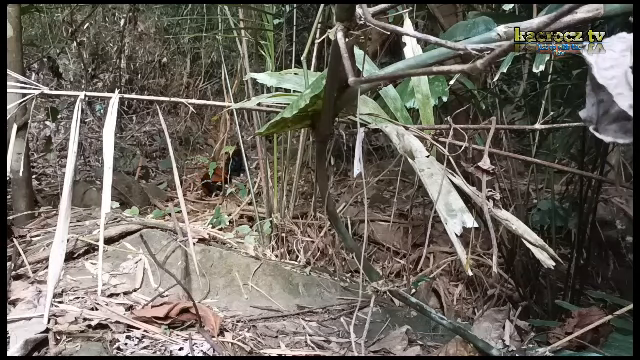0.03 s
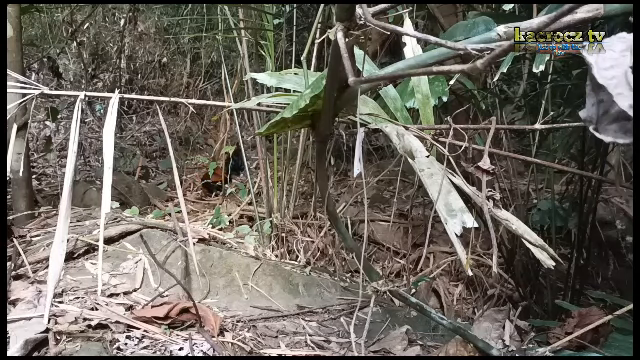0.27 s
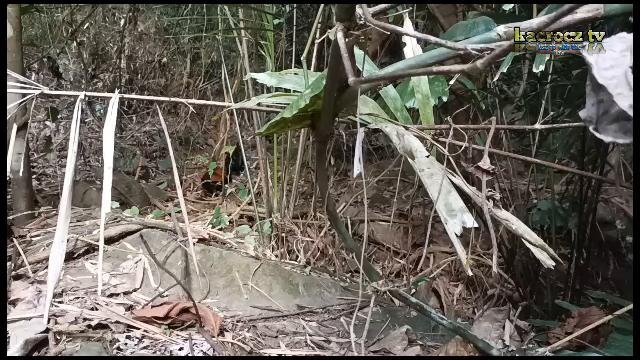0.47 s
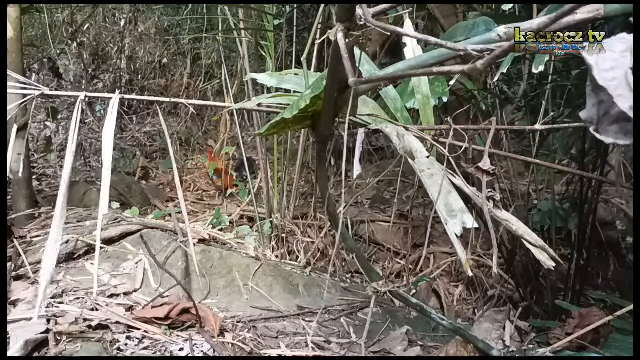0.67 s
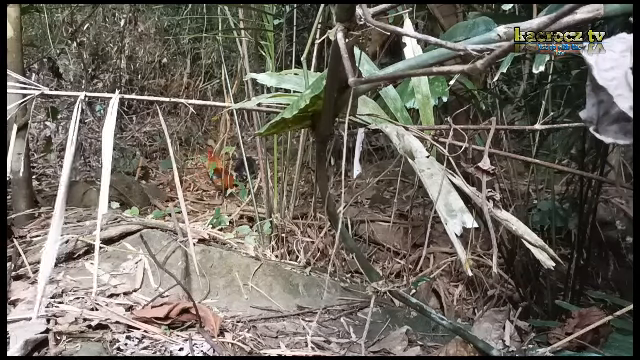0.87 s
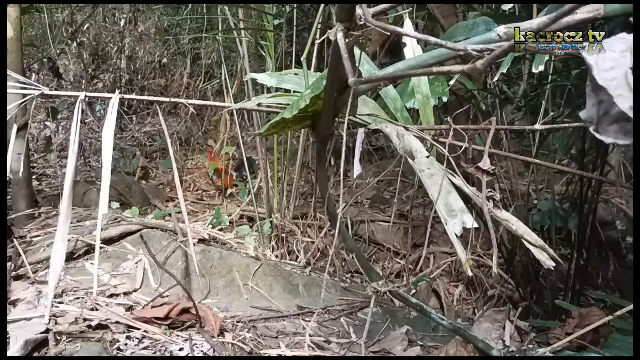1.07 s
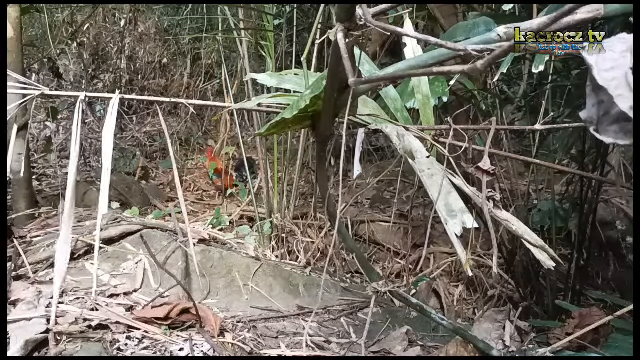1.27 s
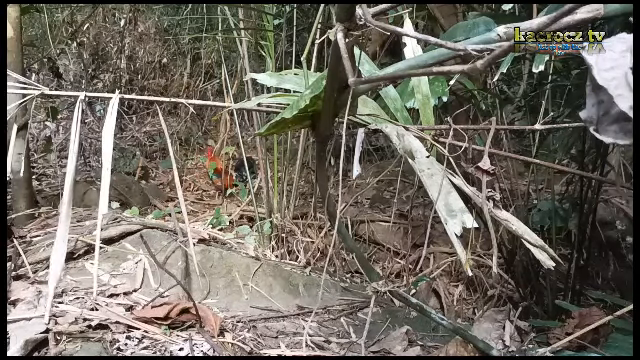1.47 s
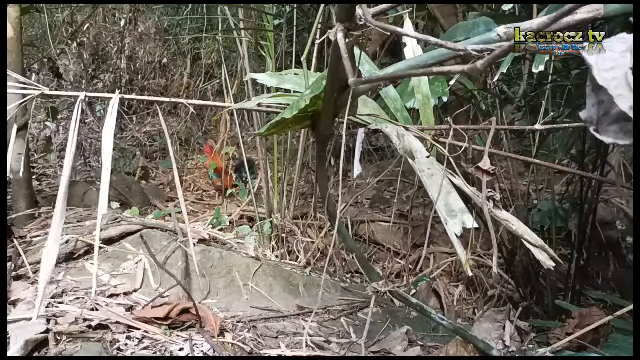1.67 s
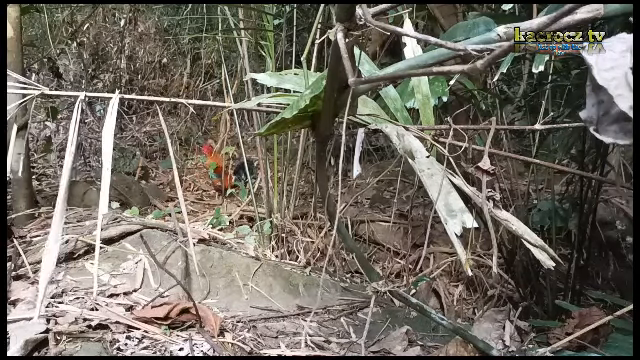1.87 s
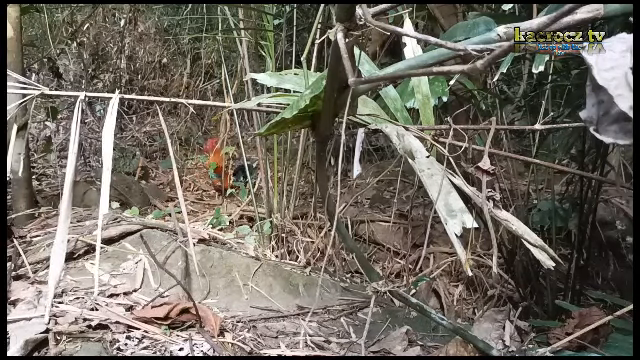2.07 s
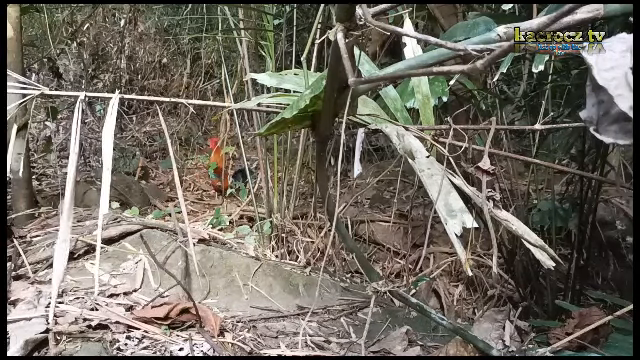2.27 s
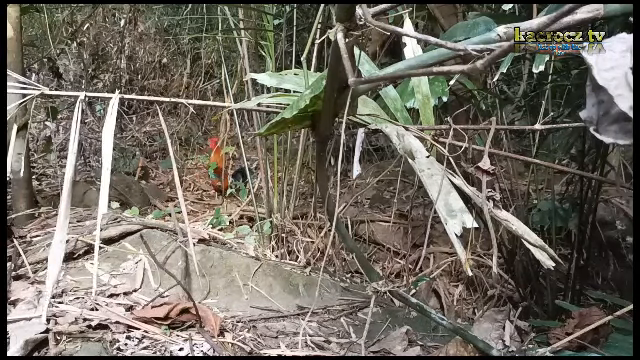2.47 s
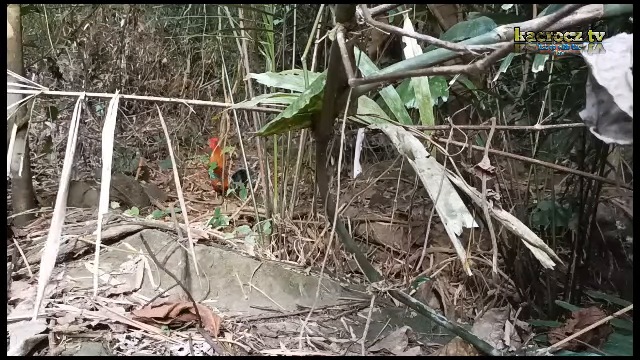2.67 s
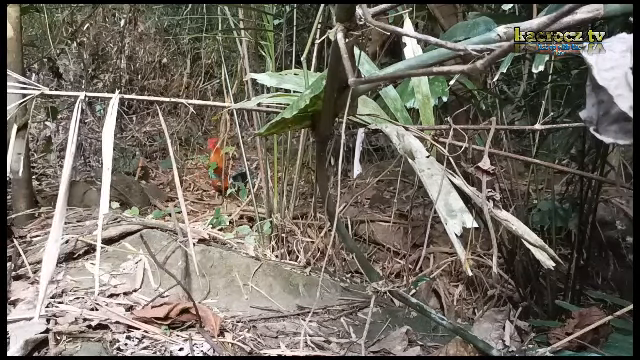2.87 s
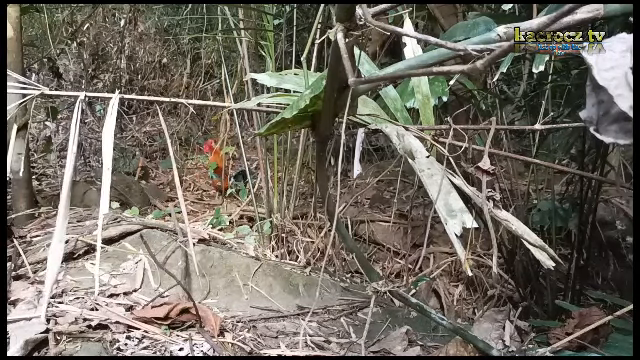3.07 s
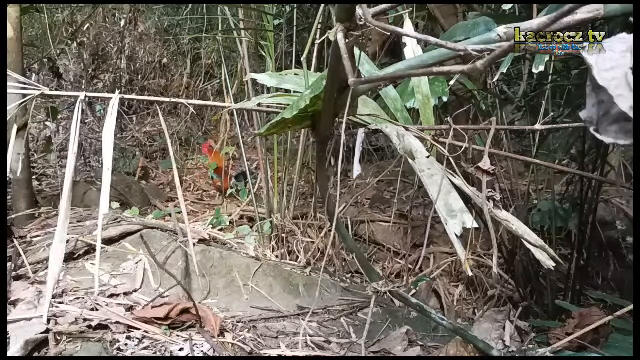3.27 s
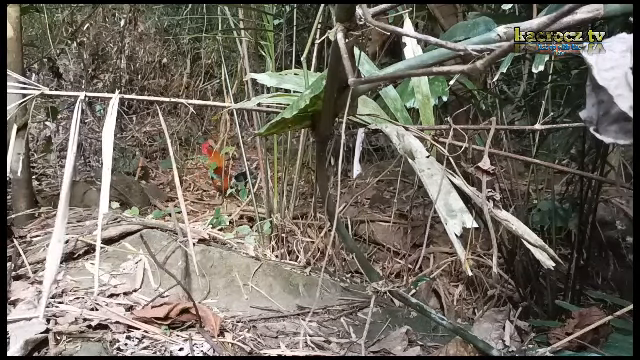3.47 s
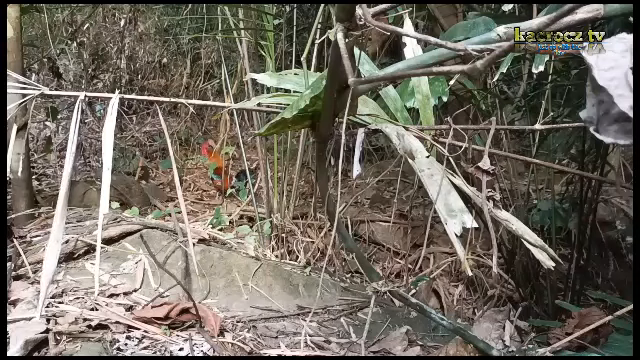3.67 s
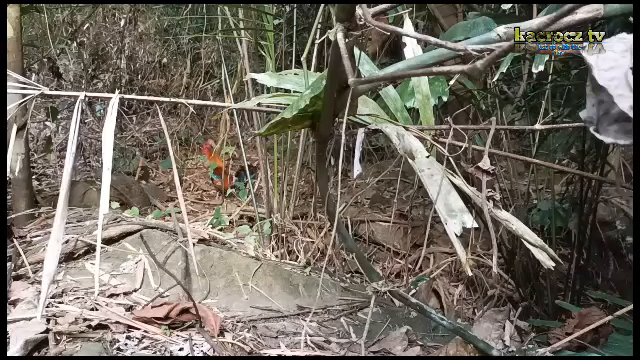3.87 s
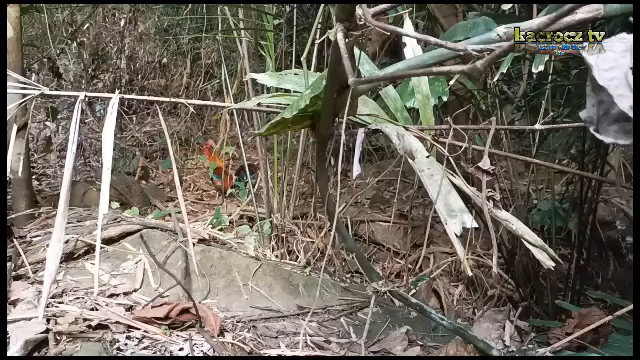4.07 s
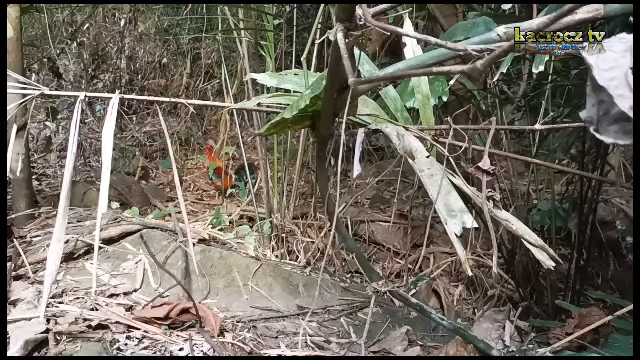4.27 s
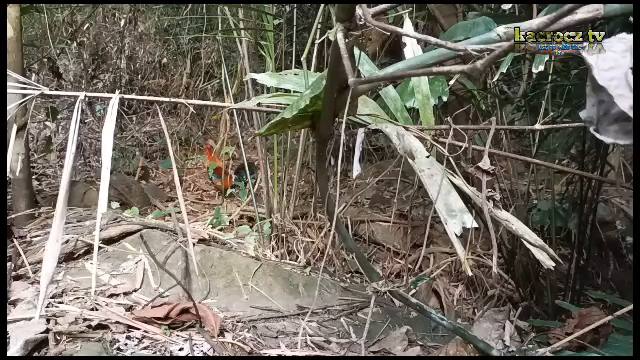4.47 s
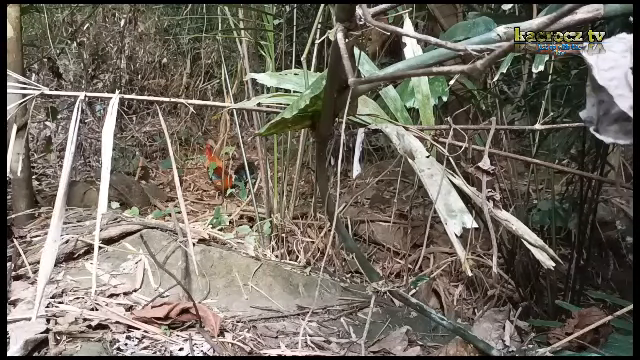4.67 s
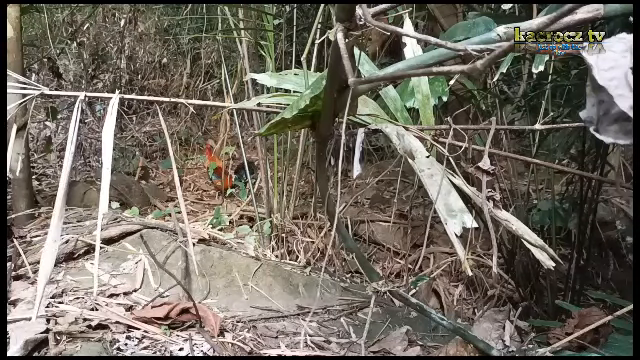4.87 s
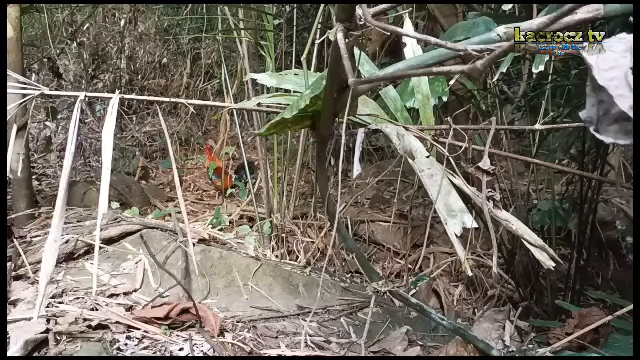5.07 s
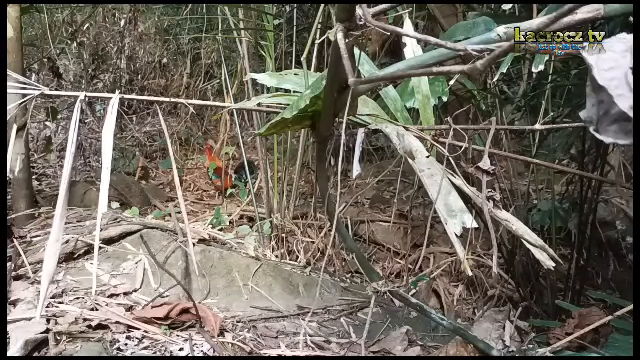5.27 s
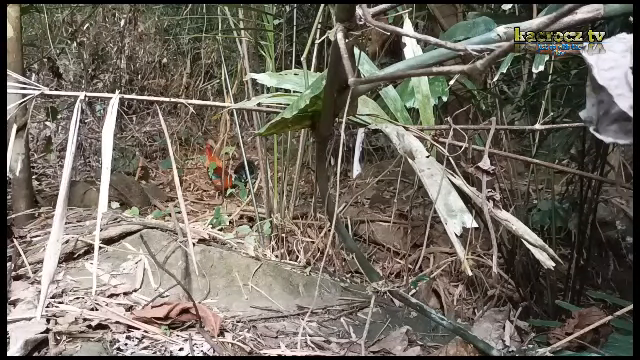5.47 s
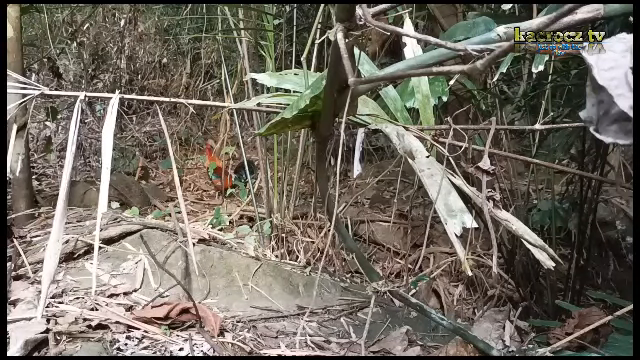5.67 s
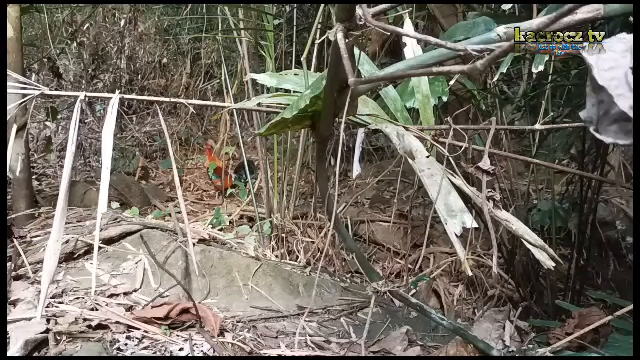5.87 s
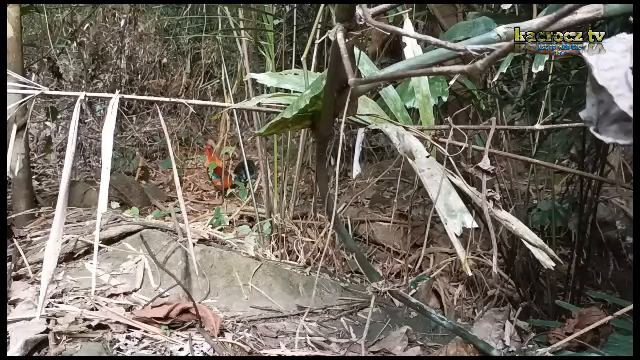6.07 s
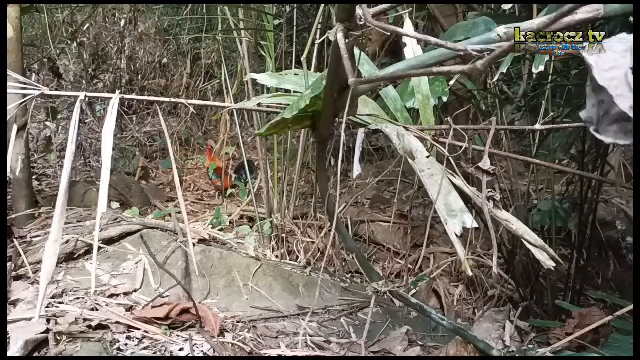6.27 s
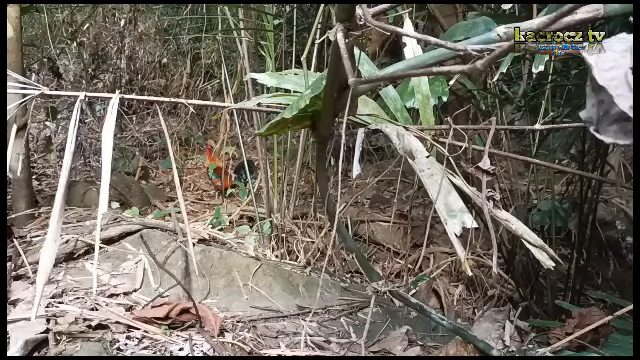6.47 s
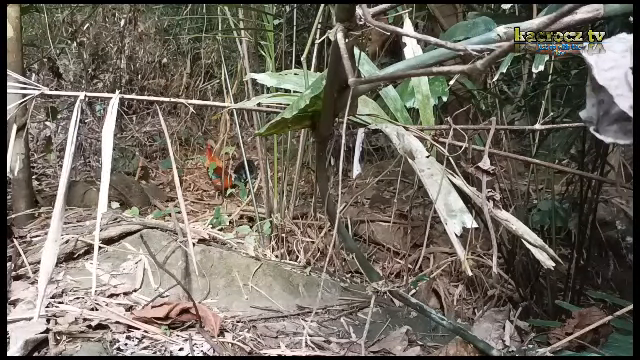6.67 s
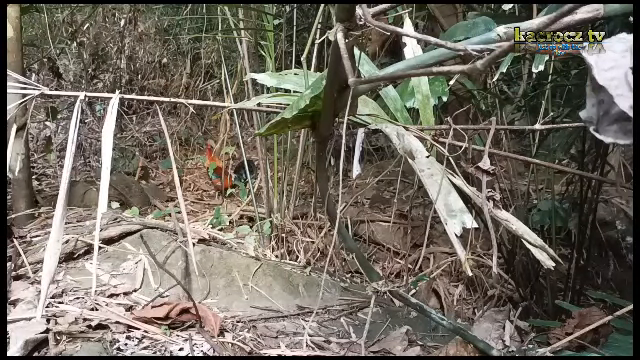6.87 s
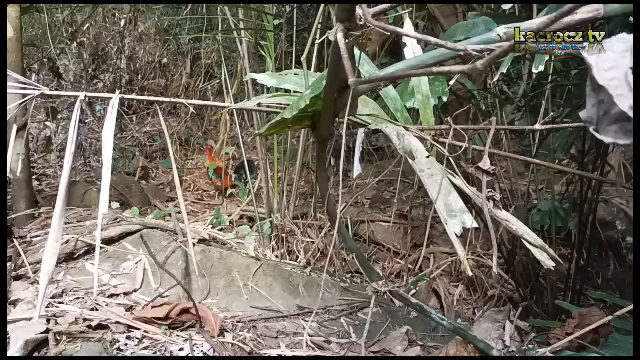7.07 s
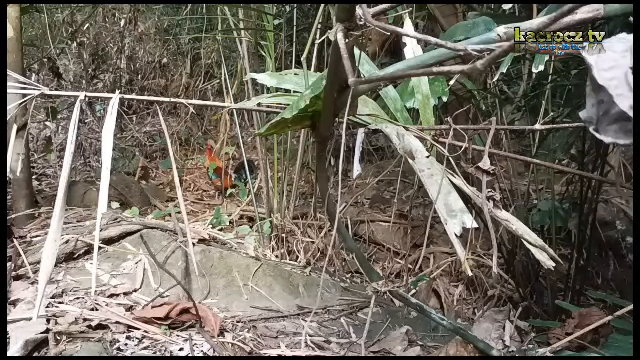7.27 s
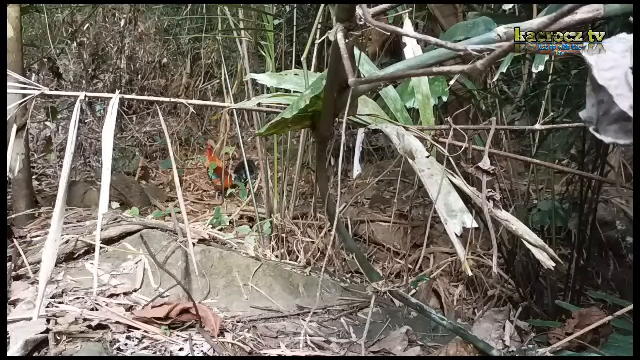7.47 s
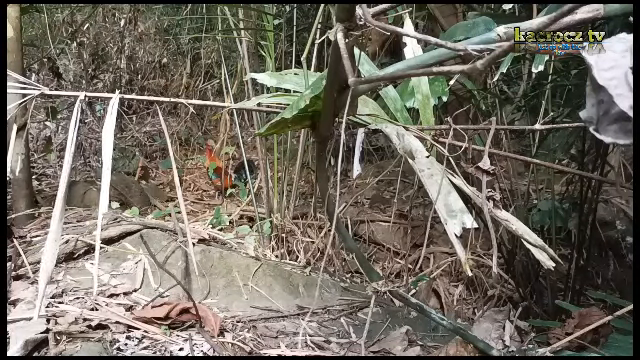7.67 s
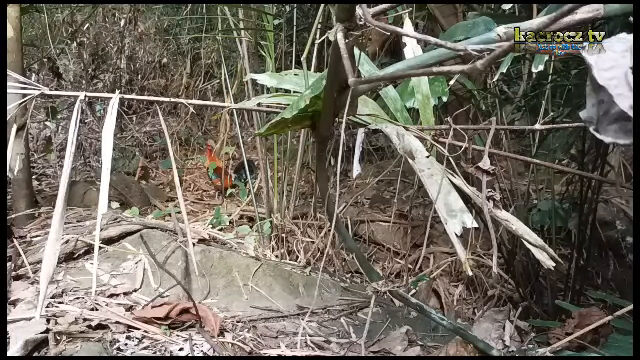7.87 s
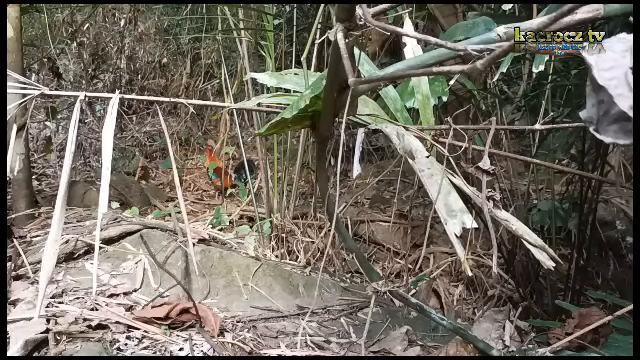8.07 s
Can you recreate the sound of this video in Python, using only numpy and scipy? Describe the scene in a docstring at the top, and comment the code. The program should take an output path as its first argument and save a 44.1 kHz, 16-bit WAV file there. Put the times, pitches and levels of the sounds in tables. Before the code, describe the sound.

A quiet forest with soft distant rumble, a fading low drone until about 3 s, and a thin steady insect hum near 6.3 kHz. Small birds are faint: thin high chirps at the start and two-note calls, high then lower, at 0.4, 1.2 and 1.8 s. The level dips very briefly at 0.7 s, cutting the first call's echo. From 2.1 to 3.75 s a wild rooster crows once, much louder than everything else: a raspy short syllable, a second with a clear yelp inside, a longer hoarse one at 2.6 s, then a note that clears, sinks and abruptly stops, with short woodland reverberation. From 4.2 s short piped notes, echoing down-slurred whistles, thin dropping calls on the right and tiny faint clucks alternate. Dry leaves stir lightly around 4.7, 5.5 and 7.3 s. A fast insect trill, stronger on the right, swells from 4.8 and stops near 6.9 s. Piping continues to 8 s.

```python
"""Forest undergrowth before two spaced microphones: filtered noise makes a low distant rumble and dry leaves,
blurred tones a high insect hum, gliding sines the thin calls, a far flock and a two-note bird.
The level dips briefly at 0.7 s and the echo of the first two-note call stops short. From 2.1 s a wild
rooster crows once: uneven pulses through resonances give hoarse syllables, partials two clear pitches.
Then piped notes, slurred whistles and faint clucks glide among the trees, leaves stir, and an insect trills."""
import sys
import numpy as np
from scipy import signal
from scipy.fft import rfft, irfft, next_fast_len
from scipy.io import wavfile
from scipy.ndimage import uniform_filter1d, map_coordinates

SR = 44100
rng = np.random.default_rng(int(sys.argv[2]) if len(sys.argv) > 2 else 0)


def transcribe(signal):
    """Save signal, clipped to [-1, 1], as a 16-bit WAV file at the path in sys.argv[1]."""
    frames = np.atleast_2d(signal).T
    limited = np.clip(frames, -1, 1)
    pcm = np.round(limited * 32767).astype(np.int16)
    wavfile.write(sys.argv[1], SR, pcm)


N = 358533
TIME = np.arange(N) / SR
EDGE_DB = -40  # where a swell starts and ends, under its top

# All levels are at the source, before its scatter and echo and before the microphones.
# distant air, its spectrum: (frequency [Hz], relative level per Hz [dB])
AIR_SPECTRUM = [(15, -22), (25, -19), (54, 0), (86, 0.5), (258, -4), (376, -8.5), (505, -8), (818, -9),
                (911, -11.5), (2210, -14), (5080, -27.5), (6290, -29), (7190, -30), (15200, -47.5)]
# distant air over time: (time [s], level [dB])
AIR_LEVEL = [(0, -58), (4, -57.5), (8.13, -57.5)]
# likeness of the air at the two microphones: (frequency [Hz], correlation [-1 to 1])
AIR_LIKENESS = [(40, .85), (100, .55), (290, .35), (700, .15), (2000, 0)]
# low drone, of which only the dying away is heard: (start [s], attack [s], hold [s], release [s], level [dB])
DRONE = (-1.6, 0.56, -1.8, 6, -53)
# far insect hum: (time [s], frequency [Hz], level [dB])
INSECT_HUM = [(0, 6400, -67.5), (.7, 6420, -69), (.72, 6255, -66), (2.05, 6340, -68), (5.5, 6300, -67),
              (7.3, 6350, -69), (8.13, 6400, -68.5)]
# stirs of dry leaves: (start [s], attack [s], release [s], level [dB])
LEAF_STIRS = [(-.01, .01, .2, -72), (4.63, 0.31, 0.95, -68.5), (5.05, 0.28, 0.52, -72),
              (5.44, 0.018, 0.39, -65), (6.95, 0.076, 0.74, -77), (7.27, .115, .27, -70.5),
              (7.89, 0.036, .5, -78)]
# spectrum of the leaf crackle: (frequency [Hz], relative level per Hz [dB])
LEAF_SPECTRUM = [(2000, -25), (4000, 8), (8000, 1), (11000, 2.5), (13000, -5), (15300, -10)]
# thin high calls that drop fast, then level out:
# (start [s], length [s], start pitch [Hz], held pitch [Hz], drop time [s], level [dB])
THIN_CALLS = [(0, 0.13, 8660, 7800, 0.018, -76), (0.158, 0.14, 8300, 7570, 0.01, -76),
              (4.518, 0.17, 8120, 7230, 0.033, -73.5), (5.515, 0.094, 7350, 6910, 0.013, -73),
              (5.76, 0.16, 8660, 7230, 0.0096, -68), (6.115, 0.06, 8870, 5500, 0.02, -70),
              (6.385, 0.046, 9000, 6900, 0.022, -75), (6.578, 0.13, 7960, 6900, .02, -72.5),
              (6.822, 0.15, 8280, 7040, 0.018, -68), (7.265, 0.057, 8530, 5340, .022, -71),
              (7.656, 0.04, 8500, 6740, .02, -78)]
# far flock before its echo: (time [s], level [dB])
FLOCK_LEVEL = [(0, -89), (1.4, -79), (2.05, -83.5), (4.4, -85.5), (4.8, -74), (5.5, -82), (6, -94),
               (6.5, -82), (7.15, -84), (7.25, -71), (7.5, -72.5), (7.7, -86), (8.13, -90)]
# two-note calls: (start [s], note length [s], low note [Hz], high note level [dB], low note level [dB])
TWO_NOTE_CALLS = [(0.415, 0.2, 3684, -65, -58), (1.207, 0.3, 3683, -67, -57.5),
                  (1.829, .22, 3793, -68.5, -52)]
# one rising note of the same bird:
# (start [s], length [s], start pitch [Hz], held pitch [Hz], rise time [s], level [dB])
RISING_NOTE = [(4.354, 0.096, 3900, 5020, 0.022, -59.5)]
# the echo of the first two-note call stops short, silent in this span: (from [s], to [s])
ECHO_GAP = (.705, 1.15)
# the level dips briefly: (start [s], fall [s], hold [s], return [s], depth [dB])
LEVEL_DIP = (.7, .012, .003, .008, -15)
# down-slurred whistles: (start [s], length [s], start pitch [Hz], held pitch [Hz], drop time [s], level [dB])
SLURRED_WHISTLES = [(1.58, .25, 2275, 2139, .1, -72), (4.6, 0.26, 2890, 2740, 0.099, -68.5),
                    (4.43, 0.096, 3070, 2690, 0.032, -60), (4.85, 0.11, 3074, 2492, 0.084, -46.5),
                    (5.19, 0.33, 3005, 1933, 0.16, -50), (6.45, 0.13, 2930, 2600, .1, -70.5),
                    (6.635, 0.032, 2707, 2300, 0.031, -53.5), (6.8, 0.087, 2740, 2135, 0.068, -71),
                    (7.11, 0.067, 1806, 1520, 0.058, -68), (7.18, .18, 2756, 1895, 0.066, -57),
                    (7.19, 0.11, 2770, 2507, 0.029, -62.5), (7.38, 0.27, 2776, 1940, 0.16, -62.5),
                    (8.08, .05, 2990, 2830, .03, -64.5)]
# hoarse syllables: (start [s], attack [s], hold [s], release [s], level [dB], throat at start [Hz],
# throat at end [Hz], then against the level: chest [dB], mouth [dB], nasal ring [dB], beak treble [dB])
SYLLABLES = [(2.097, 0.024, 0.12, 0.079, -24, 1743, 1700, -15, -5.5, -27, -17),
             (2.345, .009, .205, .025, -22, 1653, 1634, -5.5, -3, -6.5, -20),
             (2.59, .017, .522, .035, -26, 1668, 1670, -9, 1.5, -10, -25.5),
             (3.268, 0.15, 0.018, 0.18, -23, 1700, 1680, -19.5, -3, -33, -21)]
# places the moving throat resonance passes: (frequency [Hz], width of one pass [Hz])
THROAT_PLACES = [(1560, 102), (1680, 130), (1800, 76)]
# fixed resonances of the rooster: (frequency [Hz], width of one pass [Hz], relative level [dB])
CHEST_MODES = [(931, 170, 0.5), (735, 112, -11), (1234, 400, -4.5)]
MOUTH_MODES = [(2017, 117, -1), (2224, 250, -13), (2447, 108, -7.5), (3165, 240, -42)]
NASAL_MODES = [(3778, 126, 12), (3900, 230, -3)]
# the beak in the first and last syllable, columns as above
EASED_BEAK_MODES = [(4850, 440, -20), (6260, 220, -4.5), (7450, 410, 0), (8150, 220, -35),
                    (10130, 400, -16.5), (11480, 410, -20), (12400, 400, -26)]
# the beak with stretched neck, in the middle syllables, columns as above
STRETCHED_BEAK_MODES = [(4830, 900, -34), (6370, 890, -0.5), (7030, 1040, -18), (7990, 117, 11),
                        (9500, 130, 1), (12060, 460, -13), (11700, 420, -9.5), (14000, 560, -24.5)]
# clear yelp in the second syllable:
# (start [s], attack [s], hold [s], release [s], partial 1 level [dB], partial 2 level [dB])
YELP_SWELLS = [(2.391, 0.054, 0.058, 0.042, -26, -17), (2.52, .025, .03, .009, -55, -24.5)]
# upper partials of the yelp: (partial number, level against partial 2 [dB])
YELP_UPPER = [(3, -34), (4, -39), (6, -44), (8, -48)]
# clear last note, one row each for partial 1, partial 2 (level against its own curve), partial 4 and
# the higher ones (before the beak): (start [s], attack [s], hold [s], release [s], level [dB])
FALL_SWELLS = [(3.37, 0.099, 0.293, 0.0069, -37.5), (3.33, .1, 0.316, 0.023, 1),
               (3.51, 0.065, 0.048, 0.1, -30), (3.38, 0.11, 0.1, 0.28, -34)]
# pitch of the last note before its waver: (time [s], frequency [Hz])
FALL_PITCH = [(3.39, 985), (3.46, 968), (3.51, 972), (3.55, 959), (3.62, 926), (3.745, 886), (3.77, 750)]
# the strongest partial swells and sags, before its swell is added: (time [s], level [dB])
FALL_SECOND = [(3.43, -27.5), (3.538, -27.5), (3.552, -27.5), (3.59, -22), (3.618, -32), (3.712, -23),
               (3.75, -28.5)]
# every third cycle, then every second one, comes out stronger:
# (start [s], attack [s], hold [s], release [s], level [dB])
UNEVEN_SWELLS = [(3.554, 0.068, 0.058, 0.014, -38), (3.676, 0.04, 0.027, 0.012, -41)]
# lines between the partials: (multiple of a third of the pitch, level against their swell [dB])
THIRD_LINES = [(2, -19), (4, -6), (5, 1.5), (7, -12), (8, -11.5), (10, -21), (11, -17.5), (13, -15.5),
               (23, -19), (25, -16)]
# lines between the partials: (multiple of half the pitch, level against their swell [dB])
HALF_LINES = [(1, -18.5), (3, -4), (5, -18), (7, -14), (9, -28), (17, -11.5)]
# the crow at the two microphones: (frequency [Hz], left minus right [dB])
CROW_LEFT = [(60, 4), (110, 2), (200, -7), (380, -9), (690, 5.5), (1280, -1.5), (2360, 3), (4350, -2),
             (8030, -5.5), (14800, 21)]
# short piped notes: (start [s], length [s], start pitch [Hz], held pitch [Hz], end pitch [Hz],
# drop time [s], level [dB])
PIPED_NOTES = [(4.236, 0.075, 2040, 1836, 1986, 0.0083, -52.5), (4.468, .1, 2430, 2110, 2214, 0.016, -47),
               (4.663, 0.088, 2055, 1936, 2077, 0.0091, -45), (5.08, 0.11, 2050, 1920, 2114, 0.016, -44.5),
               (5.35, 0.066, 2010, 1950, 1930, .03, -65), (6.052, 0.041, 1947, 2350, 2390, 0.018, -57.5),
               (6.925, .03, 1770, 1750, 1770, .01, -64), (6.975, .055, 1755, 1784, 1800, .015, -62.5),
               (7.62, 0.044, 2140, 2040, 2010, 0.014, -48), (7.705, 0.054, 1990, 1790, 1910, 0.0079, -45),
               (7.94, 0.09, 2330, 2113, 2168, 0.016, -40.5)]
# faint low clucks: (start [s], length [s], start pitch [Hz], held pitch [Hz], drop time [s], level [dB])
CLUCKS = [(4.735, 0.03, 875, 835, .025, -59), (6.28, 0.027, 2000, 1610, 0.03, -56),
          (6.645, 0.021, 1340, 1120, 0.022, -56.5), (7.285, 0.02, 1350, 1200, 0.022, -57)]
# answer from the tree trunks: (frequency [Hz], time to fall 60 dB [s])
TRUNK_DECAY = [(500, 0.61), (2000, 0.6), (4000, 0.59), (8000, 0.77), (14000, 0.25)]


def amp(db):
    """Amplitude factor of a level in dB."""
    return 10 ** (np.asarray(db) / 20)


def unit(x):
    """x at rms 1."""
    return x / np.sqrt(np.mean(x ** 2) + 1e-20)


def along(points, hz):
    """Value at hz of (Hz, value) points on a log axis."""
    f, v = np.transpose(points)
    return np.interp(np.log(hz + 1), np.log(f + 1), v)


def curves(rows):
    """One value per sample for each column after the time."""
    s, *cols = np.transpose(rows)
    return [np.interp(TIME, s, c) for c in cols]


def wobble(rate):
    """A smooth random curve, rate knots a second."""
    knots = rng.standard_normal(int(N * rate / SR) + 4)
    return map_coordinates(knots, [TIME * rate], order=1)


def swell(s, attack, hold, release, db=0):
    """Level in dB of a sound that rises, holds and dies away; silence outside."""
    corners = np.cumsum([s, attack, hold, release])
    return db + np.interp(TIME, corners, [EDGE_DB, 0, 0, EDGE_DB], -200, -200)


def filtered(x, response):
    """x passed through a complex response of frequency."""
    m = next_fast_len(N + 8192)
    return irfft(rfft(x, m) * response(np.fft.rfftfreq(m, 1 / SR)), m)[..., :N]


def resonances(modes):
    """Causal response of (Hz, width, dB) modes; each acts twice, which keeps the valleys dark."""
    def response(f):
        return sum(amp(db) * (1j * f * w / (c * c - f * f + 1j * f * w)) ** 2 for c, w, db in modes)
    return response


def partials(turns, levels):
    """Sines at multiples of a running phase, at rms levels."""
    return sum(np.sqrt(2) * amp(db) * np.sin(2 * np.pi * k * turns) for k, db in levels)


def scatter(t60):
    """A stereo noise tail, energy 1 on the left; t60 gives the decay time in s of each frequency."""
    hz, t, z = signal.stft(rng.standard_normal((2, SR)), SR, nperseg=256)
    tail = signal.istft(z * amp(-60 * t / t60(hz)[:, None]), SR, nperseg=256)[1]
    return tail / np.linalg.norm(tail[0])


def placed(x, left_db, lead_ms, near_db, wet_db, gap_ms):
    """A source at two microphones, with quick scatter from bushes and a later answer from the trunks.

    left_db lists (Hz, left minus right dB); lead_ms is how much earlier the left hears it."""
    side = np.array([[1], [-1]]) / 2
    answer = scatter(lambda hz: along(TRUNK_DECAY, hz))
    trunks = amp(wet_db) * np.roll(answer, int(gap_ms * SR / 1000), axis=1)
    bushes = amp(near_db) * scatter(lambda hz: 0.24 + 0 * hz)  # 0.24 s to fall 60 dB
    heard = x + signal.fftconvolve(x[None], bushes + trunks, axes=1)[:, :N]

    def microphones(f):
        return amp(side * along(left_db, f)) * np.exp(2j * np.pi * f * side * lead_ms / 1000)
    return filtered(heard, microphones)


def calls(rows, rise, fade, flutter_db, waver, turn=.2):
    """Each call glides fast from its start to a held pitch; some bend to an end pitch.

    rise in s; fade and turn (the bend) as shares of the length; waver as a share of the pitch."""
    song = np.zeros(N + SR)
    unsteady = 1 + waver * wobble(200)
    for s, length, start_hz, *held_end_hz, drop, db in rows:
        held_hz, end_hz = held_end_hz[0], held_end_hz[-1]
        first = int(s * SR)
        t = np.arange(int(length * SR)) / SR
        glide_hz = (start_hz - held_hz) * np.exp(-t / drop)
        bend_hz = (end_hz - held_hz) * np.exp((t - length) / (turn * length))
        hz = (held_hz + glide_hz + bend_hz) * unsteady[first:][:len(t)]
        shape = np.clip(np.minimum(t / rise, (length - t) / (fade * length)), 0, 1)
        song[first:][:len(t)] += shape * partials(np.cumsum(hz) / SR, [(1, db)])
    return song[:N] * amp(flutter_db * wobble(110))


def rumble():
    """Distant rumble and hiss: noise, alike at both microphones only in the bass."""
    def turn(f):
        return np.arccos(np.clip(along(AIR_LIKENESS, f), -1, 1)) / 2

    def shares(f):
        return amp(along(AIR_SPECTRUM, f)) * [np.cos(turn(f)), np.sin(turn(f))]
    mid, side = filtered(rng.standard_normal((2, N)), shares)
    level_db = curves(AIR_LEVEL)[0] + .5 * wobble(0.86)
    return unit(np.array([mid + side, mid - side])) * amp(level_db)


def drone():
    """A low drone of noise in two broad resonances, fading from the start and gone by 3.2 s."""
    tone = unit(filtered(rng.standard_normal(N), resonances([(179, 75, -3), (633, 99, -13)])))
    return amp(swell(*DRONE)) * tone


def air():
    """Rumble and drone reach the left microphone 0.24 ms earlier and 3 dB louder."""
    side = np.array([[1], [-1]]) / 2
    both = rumble() + drone()
    return amp(3 * side) * filtered(both, lambda f: np.exp(2j * np.pi * f * side * 0.24 / 1000))


def blurred(width_hz):
    """Complex stereo noise within about width_hz of zero, to be moved up to a carrier."""
    noise = rng.standard_normal((2, 2, N))
    real, imaginary = filtered(noise, lambda f: np.exp(-(f / width_hz) ** 2))
    return real + 1j * imaginary


def insect_hum():
    """Many far wings blur into a narrow hum, 3 dB louder on the right."""
    hz, db = curves(INSECT_HUM)
    hum = unit(np.real(blurred(313) * np.exp(2j * np.pi * np.cumsum(hz) / SR)))
    return amp(db + 0.45 * wobble(3.57) + [[-1.5], [1.5]]) * hum


def leaves():
    """Dry leaves crackle in dense tiny grains."""
    grains = rng.standard_normal((2, N)) * amp(2.1 * wobble(900) + 0.7 * wobble(54))
    crackle = unit(filtered(grains, lambda f: amp(along(LEAF_SPECTRUM, f))))
    return crackle * sum(amp(swell(s, attack, 0, release, db)) for s, attack, release, db in LEAF_STIRS)


def thin_caller():
    """Thin high calls off to the right, each dropping fast to a level pitch."""
    song = calls(THIN_CALLS, rise=0.01, fade=0.29, flutter_db=-1, waver=0.02)
    return placed(song, [(0, -8)], lead_ms=-0.322, near_db=6, wet_db=1.5, gap_ms=12)


def far_flock():
    """Many far birds slide about in one band, so distant that little but their echo arrives."""
    voices = []
    for _ in range(10):
        turns = np.cumsum(2300 + 270 * wobble(25)) / SR
        voices.append(partials(turns, [(1, 3 * wobble(16))]))
    flock = unit(sum(voices)) * amp(curves(FLOCK_LEVEL)[0])
    return placed(flock, [(0, 2.7)], lead_ms=0.22, near_db=2.5, wet_db=12, gap_ms=15)


def two_note_bird():
    """A high note, then a lower one 0.07 s behind; the echo of the first call stops short at the dip."""
    highs, lows = [], []
    for s, length, low_hz, high_db, low_db in TWO_NOTE_CALLS:
        highs.append((s, length, 4950, 5120, .016, high_db))
        lows.append((s + .07, length, 4400, low_hz, .016, low_db))
    song = calls(highs + lows + RISING_NOTE, rise=0.11, fade=1.0, flutter_db=2.5, waver=0.011)
    heard = placed(song, [(0, 2.3)], lead_ms=0.24, near_db=0.5, wet_db=-0.5, gap_ms=25)
    return heard * ((TIME < ECHO_GAP[0]) | (TIME > ECHO_GAP[1]))


def slurred_whistler():
    """Whistles slur downwards, with strong scatter and echo around them."""
    song = calls(SLURRED_WHISTLES, rise=0.045, fade=0.14, flutter_db=3, waver=0.018)
    return placed(song, [(0, 3.8)], lead_ms=0.41, near_db=7.0, wet_db=2.5, gap_ms=30)


def steadied(x, span=0.032):
    """A steady breath holds the power even over spans longer than span (32 ms by default); quicker grain
    passes."""
    power = np.abs(uniform_filter1d(x ** 2, int(span * SR)))
    return unit(x / np.sqrt(power + 1e-20))


def hoarse():
    """The membranes slap chaotically: uneven pulses ring chest, throat, mouth, nose and beak."""
    chaos = np.clip(.3 + .15 * wobble(35), .12, .5)  # bouts of near-steady beating come and go
    cycles = np.cumsum(960 * (1 + chaos * wobble(700))) / SR
    slaps = np.diff(np.floor(cycles), prepend=0) * amp(1.9 * wobble(300) + 4.4 * wobble(130))
    source = unit(slaps) + .3 * rng.standard_normal(N)

    def ring(modes):
        return steadied(filtered(source, resonances(modes)))
    places = [hz for hz, _ in THROAT_PLACES]
    throats = [ring([(hz, width, 0)]) for hz, width in THROAT_PLACES]
    chest, mouth, nose = ring(CHEST_MODES), ring(MOUTH_MODES), ring(NASAL_MODES)
    eased, stretched = ring(EASED_BEAK_MODES), ring(STRETCHED_BEAK_MODES)

    trade_db = 1 * wobble(20)  # throat and mouth swap strength
    # the rasp sinks under the yelp, its beak treble less than the rest
    locked = amp(swell(*YELP_SWELLS[0][:4])) ** .5
    locked_db = -11.5 * locked
    voice = np.zeros(N)
    for row, beak in zip(SYLLABLES, (eased, stretched, stretched, eased)):
        s, attack, hold, release, db, start_hz, end_hz, chest_db, mouth_db, nose_db, beak_db = row
        end = s + attack + hold + release
        peak_hz = np.interp(TIME, [s, end], [start_hz, end_hz]) + 50 * wobble(20)
        # the throat resonance moves by cross-fading its fixed places
        throat = 0
        for share, x in zip(np.eye(len(places)), throats):
            throat = throat + np.sqrt(np.interp(peak_hz, places, share)) * x
        # chest, nose and beak join late and leave early
        opening = np.exp(-np.abs(TIME - s) / 0.018)
        closing = np.exp(-np.abs(end - TIME) / 0.13)
        shut_db = -22.5 * (opening + closing / 2)
        late = amp(chest_db) * chest + amp(nose_db) * nose + amp(beak_db - 0.45 * locked_db) * beak
        parts = amp(-trade_db) * throat + amp(mouth_db + trade_db) * mouth + amp(shut_db) * late
        voice += amp(swell(s, attack, hold, release, db) + locked_db) * parts
    return voice


def yelp():
    """For a moment the membranes lock into one clear pitch, rising 60 Hz a second."""
    first = np.max([swell(*row[:4], row[-2]) for row in YELP_SWELLS], axis=0)
    second = np.max([swell(*row[:4], row[-1]) for row in YELP_SWELLS], axis=0)
    hz = 1229 + 60 * (TIME - YELP_SWELLS[0][0])
    turns = np.cumsum(hz * (1 + 0.0049 * wobble(250))) / SR
    upper = [(k, second + db) for k, db in YELP_UPPER]
    return partials(turns, [(1, first), (2, second)] + upper)


def fall():
    """The last note clears, sinks and breaks off; uneven cycles add lines between its partials."""
    first, second, fourth, high_db = (swell(*row) for row in FALL_SWELLS)
    second = second + curves(FALL_SECOND)[0]
    turns = np.cumsum(curves(FALL_PITCH)[0] * (1 + 0.0031 * wobble(150))) / SR
    thirds_db, halves_db = (swell(*row) for row in UNEVEN_SWELLS)
    levels = [(1, first), (2, second), (3, second - 36), (4, fourth)]
    levels += [(k / 3, thirds_db + db) for k, db in THIRD_LINES]
    levels += [(k / 2, halves_db + db) for k, db in HALF_LINES]
    # the high partials light up as they pass the resonances of the beak
    high_levels = [(k, high_db + 3 * wobble(60)) for k in range(5, 13)]
    high = partials(turns + 0.0071 * wobble(500), high_levels)
    hiss = amp(high_db + 4.5) * rng.standard_normal(N)  # air hisses past the membranes
    return partials(turns, levels) + filtered(high + hiss, resonances(EASED_BEAK_MODES))


def rooster():
    """One crow: hoarse syllables, the locked yelp and the clear falling note from one place."""
    crow = hoarse() + yelp() + fall()
    return placed(crow, CROW_LEFT, lead_ms=0.12, near_db=-3.5, wet_db=-19, gap_ms=25)


def piper():
    """Short piped notes, nearer than the whistles, settle on a pitch and bend at the end."""
    song = calls(PIPED_NOTES, rise=0.004, fade=0.12, turn=0.226, flutter_db=1.5, waver=0.0066)
    return placed(song, [(0, 1.9)], lead_ms=0.57, near_db=-3.7, wet_db=-12, gap_ms=44)


def clucker():
    """Faint low clucks, very short falling tones with almost no echo."""
    song = calls(CLUCKS, rise=.006, fade=0.4, flutter_db=-2.5, waver=0.0089)
    return placed(song, [(0, 1.5)], lead_ms=0.17, near_db=-25, wet_db=-21, gap_ms=11)


def insect_trill():
    """A nearer insect trills at 6340 Hz in even beats, 41.8 a second, 6 dB louder on the right."""
    strength = 0.53 + unit(np.abs(blurred(60)))
    wing = np.real(strength * np.exp(2j * np.pi * 6340 * TIME + 1.2j * wobble(88)))
    beats = np.clip(0.9 + np.cos(2 * np.pi * 41.8 * (TIME - 6.06)), 0, None)
    level_db = swell(4.8, attack=.8, hold=1.22, release=.1, db=-63)
    return amp(level_db + [[-3], [3]]) * unit(wing * beats)


def scene():
    """Air, insects, leaves, birds and rooster, each at its own place and distance."""
    ground = air() + insect_hum() + leaves() + insect_trill()
    birds = thin_caller() + far_flock() + two_note_bird() + slurred_whistler() + piper() + clucker()
    return ground + birds + rooster()


def record(dry):
    """The level dips briefly; the microphones cut the deepest bass and nothing is kept above 15350 Hz."""
    dip_db = LEVEL_DIP[-1] * amp(swell(*LEVEL_DIP[:-1])) ** .5
    return filtered(dry * amp(dip_db), lambda f: (f < 15350) / np.sqrt(1 + (46 / (f + 1)) ** 5))


dry = scene()
out = record(dry)
transcribe(out)
```